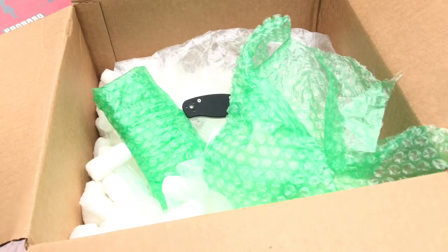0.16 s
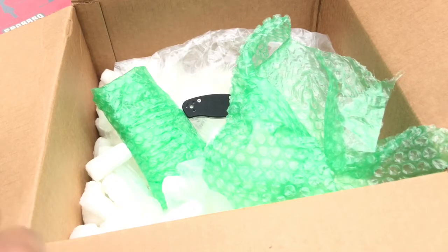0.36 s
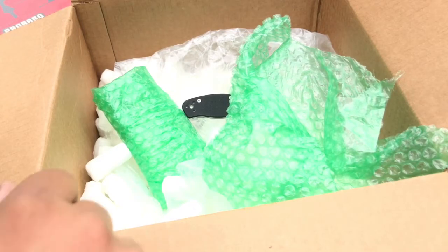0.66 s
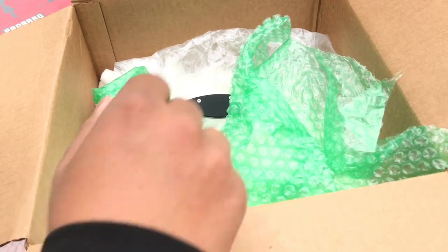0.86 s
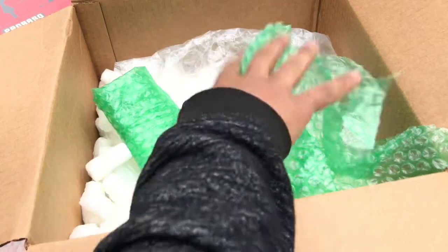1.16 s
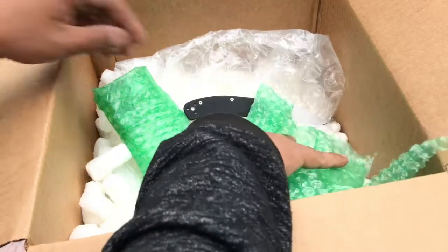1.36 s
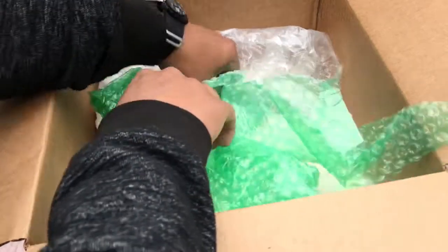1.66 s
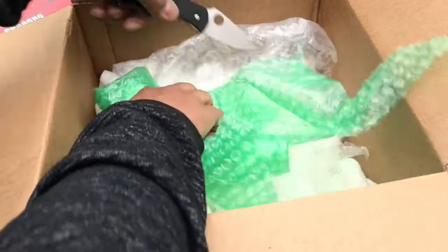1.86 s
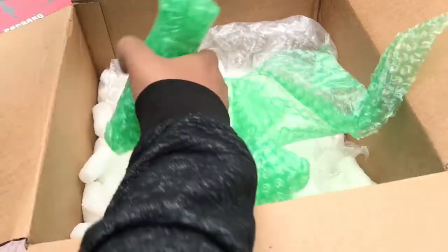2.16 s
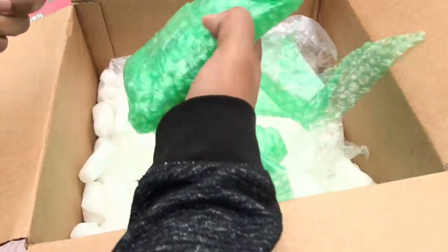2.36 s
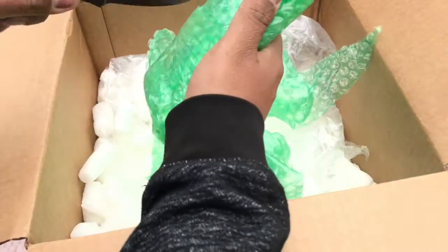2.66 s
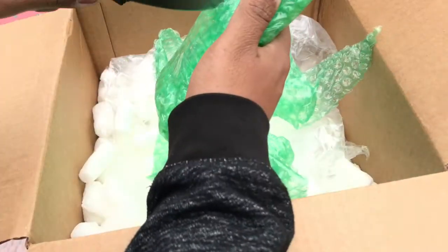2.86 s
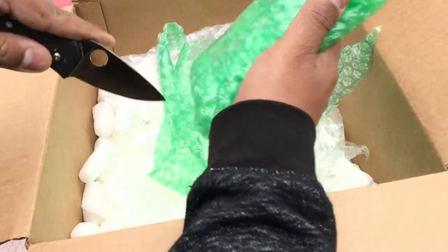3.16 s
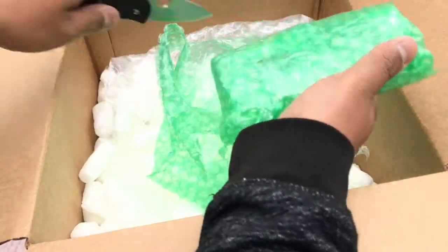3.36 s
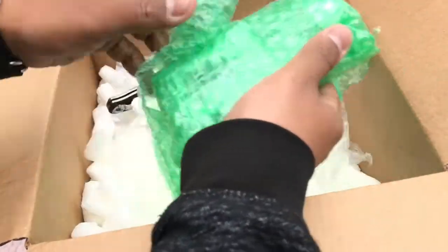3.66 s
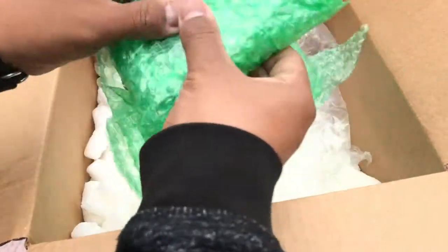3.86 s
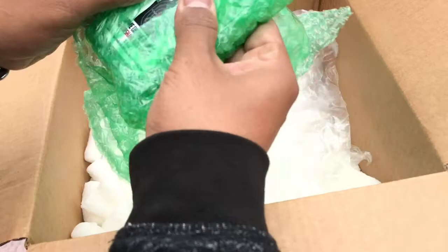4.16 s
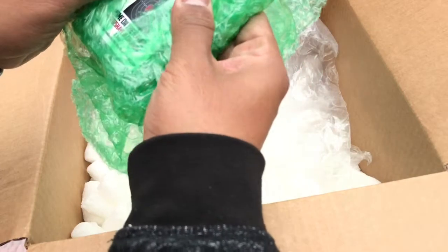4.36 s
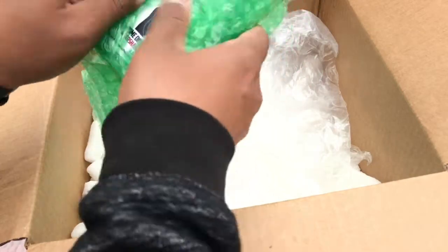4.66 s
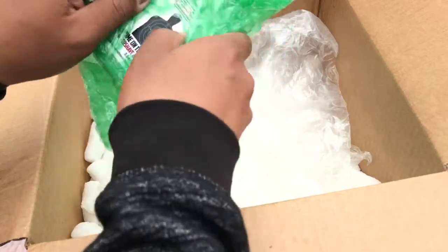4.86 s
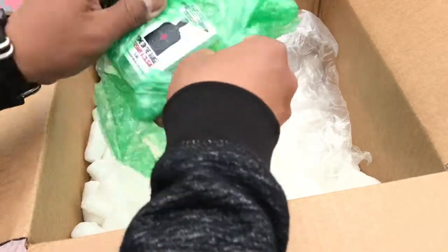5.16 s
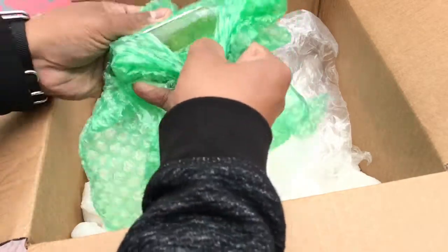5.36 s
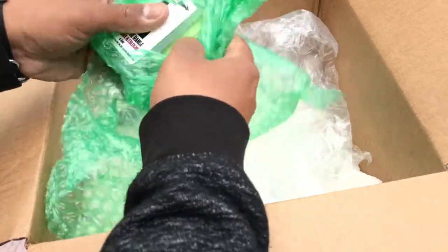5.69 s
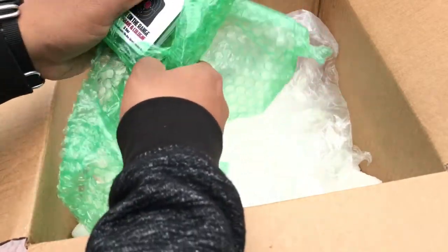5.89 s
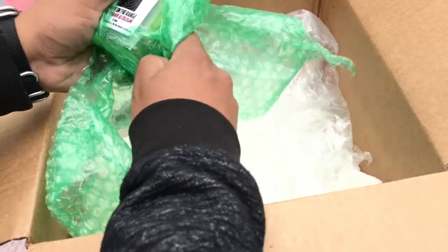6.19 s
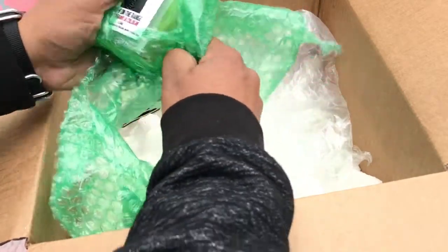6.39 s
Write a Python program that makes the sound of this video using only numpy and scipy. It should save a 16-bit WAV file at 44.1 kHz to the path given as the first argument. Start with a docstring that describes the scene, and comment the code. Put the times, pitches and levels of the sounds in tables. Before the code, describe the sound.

Close indoor unwrapping: an arm bumps the carton, plastic film rustles, a blade cuts it, and dense bright crackling follows with peeling tape.

```python
"""Unwrapping a parcel from bubble wrap

Hands unwrap a small parcel inside a cardboard box in a quiet room: an arm knocks the box, which
rings in damped modes, a sleeve hisses as filtered noise and a knife slits the film. The wrap is
pulled apart: creases snap as short resonances over a rustle of tiny clicks and sliding hiss, tape
lets go tick by tick, and stretched film whistles as gliding sines and squeals in overtones."""
import sys
import numpy as np
from scipy import signal
from scipy.fft import rfft, irfft
from scipy.io import wavfile
from scipy.ndimage import uniform_filter1d, map_coordinates

SR = 44100
rng = np.random.default_rng(int(sys.argv[2]) if len(sys.argv) > 2 else 0)


def unload_wav(signal):
    """Save mono or channel-first audio to the path in sys.argv[1] as 16-bit WAV at rate SR, clipped to [-1, 1]."""
    wavfile.write(
        sys.argv[1],
        SR,
        np.round(np.clip(np.atleast_2d(signal).T, -1, 1) * 32767).astype(np.int16),
    )


N = 287973
TIME = np.arange(N) / SR


def from_db(db):
    """Logarithmic level: decibels to amplitude gain."""
    return 10 ** (np.asarray(db) / 20)


def rms_one(x):
    """Normalisation of effective value: scale to unit rms."""
    return x / np.sqrt(np.mean(x ** 2) + 1e-20)


def in_time(rows):
    """Linear interpolation: each column of a curve at every sample."""
    s, *columns = np.transpose(rows)
    return [np.interp(TIME, s, column) for column in columns]


def during(rows):
    """Gating: true between the first and last row of a curve."""
    return (TIME > rows[0][0]) & (TIME < rows[-1][0])


def butter(x, hz, kind, order=2):
    """Causal filtering with a maximally flat (Butterworth) passband."""
    edges = np.clip(hz, 10, .45 * SR)
    sections = signal.butter(order, edges, kind, fs=SR, output="sos")
    return signal.sosfilt(sections, x + 1e-18)


def drift(per_s):
    """Slow random fluctuation of unit rms: straight lines between random knots."""
    knots = rng.standard_normal(int(N / SR * per_s) + 2)
    return rms_one(np.interp(TIME * per_s, np.arange(len(knots)), knots))


def fade(t60, size):
    """Exponential decay: 60 dB lost in t60 seconds."""
    return from_db(-60 * TIME[:size] / t60)


def ring(x, hz, t60):
    """Damped resonance: a unit click starts a decaying sine whose initial height is about one."""
    radius = from_db(-60 / (t60 * SR))
    angle = 2 * np.pi * min(hz, .45 * SR) / SR
    return signal.lfilter([0, radius * np.sin(angle)],
                          [1, -2 * radius * np.cos(angle), radius * radius], x + 1e-18)


def colour(x, spectrum, size=4096):
    """Minimum-phase filtering: a causal response with the given spectrum, built by its cepstrum."""
    hz, db = np.transpose(spectrum)
    grid = np.maximum(np.arange(size // 2 + 1) * SR / size, 1)
    cepstrum = irfft(np.log(from_db(np.interp(np.log(grid), np.log(hz), db))))
    # fold the cepstrum onto positive time
    cepstrum[1:size // 2] *= 2
    cepstrum[size // 2 + 1:] = 0
    response = irfft(np.exp(rfft(cepstrum)))
    return signal.fftconvolve(x, response)[:len(x)]


def even(x, size=1100):
    """Automatic gain: divide by the smoothed rms, steadying loudness but keeping single grains."""
    power = uniform_filter1d(uniform_filter1d(x * x, size), size)
    return x / np.sqrt(np.abs(power) + 1e-6 * np.mean(x * x))


def add(out, s, sound):
    """Superposition: mix a short sound in, starting at s seconds."""
    i = int(np.clip(round(s * SR), 0, N - 1))
    out[i:i + len(sound)] += sound[:N - i]


# Spectrum of the room noise. Each row: frequency in Hz, relative level in dB.
ROOM_SPECTRUM = [(20, -26), (35, -13), (55, 0), (90, -21), (130, -15.5), (200, -15.5), (600, -22),
                 (1100, -23), (2000, -36), (3800, -28), (7000, -41.5), (16000, -43)]
# Low hum in the room. Each row: time in seconds, mean level in dB.
HUM_LEVELS = [(0, -64), (.2, -59), (.45, -72), (.55, -55.5), (1.2, -53.5), (2.2, -70), (3.2, -57),
              (3.6, -70), (6.53, -83)]
# Low rumble while the arms move. Each row: time in seconds, level in dB.
RUMBLE_LEVELS = [(0, -65), (.7, -60), (1.1, -54), (1.8, -52.5), (2.3, -57), (3.3, -60.5), (3.7, -50),
                 (4.2, -59.5), (4.8, -53.5), (5.8, -56), (6.53, -57.5)]


def background(air_db=-59.5, hum_hz=130, whine_hz=2530, whine_db=-74.5):
    """Broadband and narrowband noise: room air, a faint whine, a wavering hum and a low rumble."""
    air = from_db(air_db) * rms_one(colour(rng.standard_normal(N), ROOM_SPECTRUM))
    whine = from_db(whine_db) * rms_one(ring(rng.standard_normal(N), whine_hz, t60=0.029))
    hum_phase = 2 * np.pi * np.cumsum(hum_hz + 3 * drift(21)) / SR
    hum = from_db(in_time(HUM_LEVELS)[0] + 2 * drift(12)) * rms_one(np.sin(hum_phase))
    low_noise = rms_one(butter(rng.standard_normal(N), [50, 105], "band"))
    rumble = from_db(in_time(RUMBLE_LEVELS)[0]) * low_noise
    return air + whine + hum + rumble


# Soft bumps of hands and parcel.
# Each row: start in seconds, initial level in dB, frequency in Hz, t60 in seconds.
SOFT_BUMPS = [(0.143, -41.5, 365, 0.051), (1.02, -35.5, 302, 0.055), (1.565, -34, 171, 0.029),
              (1.583, -27.5, 388, 0.045), (2.297, -34, 295, 0.024), (3.62, -31, 300, 0.062),
              (3.652, -36, 65, 0.1), (4.095, -40, 170, 0.032), (4.68, -44, 180, 0.055),
              (5.047, -34, 130, 0.045), (5.221, -38, 72.4, 0.12), (5.43, -31, 377, 0.029),
              (5.448, -32.5, 74, 0.3), (5.711, -42, 77, .15), (5.854, -37, 245, .07)]
# Light brushes against the wrap. Each row: start in seconds, initial level in dB, t60 in seconds.
LIGHT_BRUSHES = [(0.0404, -51.5, .008), (0.1413, -45, 0.11), (0.158, -49.5, 0.12), (.5745, -55, 0.0091),
                 (1.1748, -44.5, 0.0078)]


def light_touches(size=12000):
    """Damped resonance and decaying noise: padded bumps ring low, brushes are puffs of hiss."""
    out = np.zeros(N)
    for s, level_db, hz, t60 in SOFT_BUMPS:
        add(out, s, from_db(level_db) * ring(signal.unit_impulse(size), hz, t60))
    for s, level_db, t60 in LIGHT_BRUSHES:
        hiss = rms_one(butter(rng.standard_normal(size), [900, 15000], "band", order=1))
        add(out, s, from_db(level_db) * hiss * fade(t60, size))
    return out


def sleeve(reach_s=0.91, width_s=0.34, level_db=-60):
    """Friction noise: cloth hisses most as the arm, reaching over the box, passes closest."""
    nearness = np.exp(-((TIME - reach_s) / width_s) ** 2)
    hiss = rms_one(butter(rng.standard_normal(N), [720, 3950], "band", order=4))
    return from_db(level_db) * nearness * hiss


# Blows on the box. Each row: start in seconds, relative strength in dB, contact cut-off in Hz.
BOX_BLOWS = [(.8310, -4.5, 6140), (0.8378, -26, 4000), (0.8789, -16, 3480), (0.9895, -23, 1500)]
# Vibration modes of the box. Each row: frequency in Hz, relative level in dB, t60 in seconds.
PANEL_MODES = [(215, -17, 0.18), (368, -10, 0.31), (442, 1, 0.087), (506, -5.5, 0.16), (731, -8, 0.16),
               (870, -8, 0.14), (1000, -3, 0.044), (1060, -11, 0.054), (1310, -17, 0.048), (1463, -4, 0.11),
               (1610, -2, 0.065), (2060, -0.5, 0.031), (2400, 0, 0.036), (2520, -10.5, 0.089),
               (3140, -10, 0.057), (3550, -2.5, 0.052), (4130, -1.5, 0.055)]
# Spectrum of the papery crack. Each row: frequency in Hz, relative level in dB.
CARDBOARD_SPECTRUM = [(47, -61), (80, -14), (219, -12), (325, -8.5), (371, -1.5), (515, -5), (587, -9),
                      (655, -5.5), (2230, -16.5), (4120, -19.5), (15000, -43)]


def knocks(crack_t60=0.1, boom_t60=0.63, boom_top_hz=480, boom_db=-23.5, modes_db=-15.0,
           noise_gain=0.45, level_db=0.03, size=30000):
    """Modal synthesis: panel modes ring under a papery noise crack; a low noise boom hangs on."""
    out = np.zeros(N)
    for s, strength_db, contact_hz in BOX_BLOWS:
        modes = np.zeros(size)
        for hz, db, t60 in PANEL_MODES:
            gain = from_db(db + rng.normal(0, 0.97)) * rng.choice([-1, 1])
            modes += gain * ring(signal.unit_impulse(size), hz, t60)
        crack = rms_one(colour(rng.standard_normal(size), CARDBOARD_SPECTRUM)) * fade(crack_t60, size)
        low_noise = butter(rng.standard_normal(size), [120, boom_top_hz], "band", order=3)
        boom = rms_one(low_noise) * fade(boom_t60, size)
        blow = from_db(modes_db) * modes + noise_gain * (crack + from_db(boom_db) * boom)
        # a softer contact excites less treble
        blow = butter(blow, contact_hz, "low", order=1)
        add(out, s, butter(blow, 73, "high") * from_db(strength_db + level_db))
    return out


# Steady rustle of the held wrap, before the band trims in crinkle().
# Each row: time in seconds, crinkle level in dB, dull rubbing in dB relative to the crinkle,
# fine fizz in dB relative to the crinkle.
GRIP_LEVELS = [(1.23, -53.5, -3, 9), (1.5, -56.5, -0.5, -3), (1.63, -49, -1, -1), (2.1, -52.5, 0.5, -0.5),
               (2.65, -54.5, -11, -3.5), (2.85, -66.5, -4, 2.5), (3.02, -51, -13, 0), (3.23, -59.5, 0, 0),
               (3.42, -54.5, -8, -3.5), (3.54, -56.5, 0.5, -2), (3.68, -43, -0.5, 1.5), (3.9, -41, -16, -1),
               (4.22, -51.5, -16.5, 4), (4.77, -48.5, -13, 5), (4.95, -43.5, -17, 1),
               (5.45, -46.5, -12.5, 7), (6.0, -45, -9.5, 0.5), (6.53, -42, -14, 4.5)]


def grip():
    """Spectral balance of steady friction: rub, crinkle and fizz gains, near zero outside the grip."""
    level_db, rub_db, fizz_db = in_time(GRIP_LEVELS)
    gains = from_db([level_db + rub_db, level_db, level_db + fizz_db])
    return gains * during(GRIP_LEVELS) + 1e-6


# Swells of each brush, squeeze or pull, before the band trims in crinkle().
# Each row: peak time in seconds, rise in seconds, fall in seconds, crinkle level in dB,
# dull rubbing in dB relative to the crinkle, fine fizz in dB relative to the crinkle.
HAND_STROKES = [(1.312, 0.082, 0.077, -39.5, -5.5, 1.5), (1.575, 0.047, 0.037, -40.5, 3, -3),
                (1.69, 0.014, 0.089, -48.5, -1, -1), (1.88, 0.26, .15, -45.5, -7.5, -1.5),
                (2.46, 0.063, .12, -50, -18, 4.5), (2.905, 0.022, .022, -45, -11, -0.5),
                (2.975, .03, 0.052, -42, -15, -2), (3.042, 0.014, 0.043, -36.5, -10, -1),
                (3.105, 0.042, 0.052, -33, -13.5, -12), (3.146, 0.044, 0.053, -33.5, -14.5, -2),
                (3.576, .018, 0.017, -39, -3.5, -5), (3.638, 0.055, 0.036, -36, -2, -2.5),
                (3.8, 0.068, 0.056, -41, -9.5, 2), (3.915, .02, .02, -44, -22, -3),
                (3.978, 0.033, 0.058, -37, -21, 3), (4.095, 0.052, 0.075, -37, -22, 6.5),
                (4.29, 0.089, .14, -45, -17, 3.5), (4.525, 0.042, 0.014, -43, -16, 14),
                (4.583, .012, 0.043, -41.5, -16, 1), (4.648, .02, 0.025, -44, -12, 2),
                (4.696, 0.032, 0.078, -41.5, -8.5, 3.5), (4.805, 0.017, .012, -44, -20, 3),
                (4.86, 0.031, 0.045, -41, -20, 3), (5.02, 0.043, 0.039, -49, -9, 13),
                (5.195, 0.078, 0.086, -37, -25, 7.5), (5.295, 0.08, 0.09, -35.5, -37, 9),
                (5.405, 0.044, 0.026, -38.5, -19, 0), (5.51, 0.036, 0.063, -34.5, -15, 1.5),
                (5.78, 0.19, 0.18, -42, -8, 1), (6.11, 0.055, 0.027, -44, -5, 4.5),
                (6.299, 0.04, 0.043, -39.5, -19, 6), (6.371, 0.022, 0.046, -30.5, -29, 4),
                (6.515, 0.063, 0.046, -43, -12, 6.5)]


def handling(sharpness=0.92):
    """Addition of powers: every stroke is an arch of effort on the grip; gives band levels in dB."""
    power = grip() ** 2
    for peak, rise, fall, level_db, rub_db, fizz_db in HAND_STROKES:
        start, end = peak - rise, peak + fall
        now = (TIME > start) & (TIME < end)
        progress = np.interp(TIME[now], [start, peak, end], [0, .5, 1])
        arch = np.sin(np.pi * progress) ** sharpness  # higher sharpness: more pointed
        gains = from_db([level_db + rub_db, level_db, level_db + fizz_db])
        power[:, now] += np.outer(gains, arch) ** 2
    return 10 * np.log10(power)


def folds(x, mirror=0.56, delay_s=0.000445, wander=0.474, per_s=16):
    """Comb filtering: a reflection from a nearby moving fold keeps shifting the film's colour."""
    lag = delay_s * np.exp(wander * drift(per_s))
    depth = mirror * np.tanh(drift(per_s))
    reflection = map_coordinates(x, [(TIME - lag) * SR], order=3)
    return (x + depth * reflection) / np.sqrt(1 + depth ** 2)


# Manner of touch. Each row: time in seconds, smooth sliding hiss in dB relative to the creases,
# tautness as upper over lower crinkle in dB.
TOUCH_MANNER = [(1.28, 5, 3.5), (1.5, 2.5, 0.5), (2.0, .5, 0), (2.75, -4, 6.5), (3.1, -3.5, 0),
                (3.4, 2.5, 5.5), (3.65, 2, 1.5), (4.05, -3.5, 8), (4.58, -8.5, 2.5), (5.05, -1.5, 2),
                (5.3, 0.5, 7), (5.8, 1, 3.5), (6.2, -3.5, 1), (6.35, 2, 12), (6.5, -7.5, 9)]
# Spectrum of the plastic film. Each row: frequency in Hz, relative level in dB.
FILM_SPECTRUM = [(59, -26), (100, -3), (420, -5.5), (758, -10.5), (1730, -4.5), (2180, -7.5), (4960, -6.5),
                 (5870, 2), (7730, 3), (8580, 7), (10400, 5), (11800, 5.5), (15500, -2)]


def crinkle(creases_per_s=1050, spread_db=5.5, cycles=10.2, rub_db=1.0, crinkle_db=2.0, fizz_db=-1.5,
            rub_hiss_db=3.0, low_edge_hz=1130):
    """Random buckling: countless small creases ring at chance times over hiss of film on film."""
    rub, mid, fizz = handling()
    hiss_db, taut_db = in_time(TOUCH_MANNER)
    # creases come faster with more sliding, and cluster at random
    per_s = creases_per_s * from_db(hiss_db) * from_db(4 * drift(90))
    sizes = from_db(spread_db * np.minimum(rng.exponential(1, N), 2.8)) * rng.choice([-1, 1], N)
    clicks = sizes * (rng.random(N) < per_s / SR)
    # each click is dealt to one facet pitch
    pitches = np.geomspace(1300, 14500, 24)
    dealt = rng.integers(0, len(pitches), N)
    facets = np.zeros(N)
    for k, hz in enumerate(pitches):
        facets += ring(clicks * (dealt == k), hz, cycles / hz) * np.sqrt(hz)  # high ones are stronger
    brightened = np.diff(facets, prepend=0) + .5 * facets
    grains = folds(colour(brightened, FILM_SPECTRUM))
    hiss = folds(colour(rng.standard_normal(N), FILM_SPECTRUM)) * from_db(2.0 * drift(150))

    def band(edges, smooth_db=0):
        """Band-pass mixing: creases and hiss within one range of pitch, at a steady level."""
        creases = even(butter(grains, edges, "band", order=3))
        sliding = rms_one(butter(hiss, edges, "band", order=3))
        return even(creases + from_db(hiss_db + smooth_db) * sliding)

    # taut film crinkles higher than slack film
    body = even(band([low_edge_hz, 2600]) + from_db(taut_db) * band([2600, 4900]))
    rubbing = from_db(rub + rub_db) * band([160, 1000], rub_hiss_db)
    fizzing = from_db(fizz + fizz_db) * band([5200, 18000])
    return rubbing + from_db(mid + crinkle_db) * body + fizzing


def lesser_snaps(per_s=11, pitch_hz=6300, pitch_spread=0.29, over_grip_db=15.5, spread_db=2.5,
                 pop_db=-16, count=300):
    """Random thinning: of many possible creases some give way, as strongly as the grip is firm."""
    s, grip_db = np.transpose(GRIP_LEVELS)[:2]
    when = rng.uniform(s[0], s[-1], count)
    level_db = np.interp(when, s, grip_db) + over_grip_db + rng.normal(0, spread_db, count)
    hz = pitch_hz * np.exp(rng.normal(0, pitch_spread, count))
    gives_way = rng.random(count) < per_s * (s[-1] - s[0]) / count
    return list(np.column_stack([when, level_db, hz, level_db + pop_db])[gives_way])


def snap(hz, level_db, cycles, flutter, flutter_t60, size=300):
    """Snap-through buckling: a facet flips with a sharp step, brief ringing and noisy flutter."""
    push = signal.unit_impulse(size) + flutter * rng.standard_normal(size) * fade(flutter_t60, size)
    wave = ring(push - np.roll(push, 1) * 0.55, hz, cycles / hz)
    # the level is that of the whole energy packed into a millisecond
    return wave * from_db(level_db) / np.sqrt(np.sum(wave ** 2) / (SR / 1000))


# The loudest creases snapping over.
# Each row: start in seconds, crack level over a millisecond in dB before filtering,
# crack pitch in Hz, dull pop of the sheet in dB before its trim and filtering.
LOUD_SNAPS = [(1.39, -27.5, 7240, -61), (1.5818, -26, 3460, -45), (2.2024, -35, 1890, -62),
              (2.3166, -34.5, 5800, -63), (2.4176, -35, 6400, -61), (2.6895, -35.5, 5660, -65),
              (2.7799, -34, 2480, -51), (2.8097, -37.5, 5000, -60), (2.971, -26, 3420, -42),
              (3.0403, -15, 2120, -26.5), (3.0659, -16.5, 2140, -31), (3.084, -24, 2700, -36),
              (3.1092, -12.5, 2350, -35), (3.1271, -13, 2680, -40), (3.1398, -11, 2930, -43),
              (3.1517, -22, 3100, -43), (3.1686, -18, 3200, -44), (3.178, -17.5, 3100, -29.5),
              (3.198, -33.5, 3500, -55), (3.2534, -19.5, 2620, -39), (3.2818, -34, 4200, -60),
              (3.832, -18, 5560, -50), (3.9007, -27, 7900, -49), (4.0036, -20.5, 5500, -65),
              (4.0533, -21, 5370, -64), (4.0962, -14, 6600, -29.5), (4.1246, -23, 8300, -61),
              (4.1375, -19, 6300, -39.5), (4.1487, -15.5, 9800, -59), (4.1702, -18.5, 9900, -62),
              (4.267, -15.5, 7240, -65), (4.3372, -24.5, 2820, -56), (4.4685, -21.5, 9100, -63),
              (4.4784, -24, 6250, -43), (4.5113, -27, 7240, -63), (4.5323, -24, 6550, -37),
              (4.5905, -24, 5300, -48), (4.6718, -27, 6800, -48), (4.6903, -19.5, 8900, -47),
              (4.7032, -20.5, 3500, -40), (4.8097, -24.5, 6240, -57), (4.875, -21.5, 7600, -44),
              (4.9565, -27, 7500, -60), (5.0066, -27, 8300, -56), (5.075, -23, 8050, -54),
              (5.0893, -20, 3400, -53), (5.1341, -23, 6500, -55), (5.1824, -16.5, 3240, -62),
              (5.2202, -21, 5700, -29.5), (5.2277, -12, 2920, -47), (5.2445, -14, 5960, -53),
              (5.4724, -21, 7140, -55), (5.5338, -23, 4570, -37), (5.7746, -17.5, 5040, -44),
              (5.8976, -25, 6800, -39), (5.9833, -22.5, 6520, -58), (6.0339, -16.5, 5330, -53),
              (6.1141, -26, 8050, -35), (6.1423, -23, 9700, -60), (6.166, -15.5, 4500, -29),
              (6.302, -12.5, 4130, -39), (6.3335, -20, 7200, -50), (6.3553, -18, 8140, -51),
              (6.4036, -19.5, 4900, -54), (6.455, -26, 7400, -54), (6.526, -23.5, 3970, -41)]


def snaps(pop_db=0.5, pop_hz=640, facet_db=-9.0, lowest_hz=1150):
    """Coupled resonators: each snapping crease shakes a larger facet and dully pushes the sheet."""
    out = np.zeros(N)
    for s, level_db, hz, sheet_db in LOUD_SNAPS + lesser_snaps():
        crack = snap(hz, level_db, cycles=3.0, flutter=0.051, flutter_t60=0.01)
        facet_hz = hz * rng.uniform(0.298, 0.79)
        facet = snap(facet_hz, level_db + facet_db, cycles=13.0, flutter=0.95, flutter_t60=0.015)
        add(out, s, butter(crack + facet, lowest_hz, "high", order=3))
        pop = snap(pop_hz, sheet_db + pop_db, cycles=3.7, flutter=0.045, flutter_t60=0.011)
        add(out, s, butter(pop, 1250, "low"))
    return out


# Thin gliding whistles during the cut. Each row: peak time in seconds, frequency at the peak in Hz,
# glide in Hz per second, peak rms level in dB, t60 in seconds.
CUT_WHISTLES = [(2.968, 905, -500, -44.5, 0.15), (3.048, 976, 700, -33.5, 0.054),
                (3.184, 838, 1902, -37.5, 0.29)]


def whistle(waver=0.004, rise_db_per_s=1001):
    """Frequency modulation: nearly pure tones swell quickly, glide and die away."""
    out, unsteady = np.zeros(N), 1 + waver * drift(150)
    for peak, hz, glide, level_db, t60 in CUT_WHISTLES:
        now = (TIME > peak - 60 / rise_db_per_s) & (TIME < peak + t60)
        t = TIME[now] - peak
        swell_db = np.minimum(rise_db_per_s * t, -60 * t / t60)
        phase = 2 * np.pi * np.cumsum((hz + glide * t) * unsteady[now]) / SR
        out[now] += np.sqrt(2) * np.sin(phase) * from_db(level_db + swell_db)
    return out


# Tape peeling in regular jerks. Each row: first tick in seconds, last tick in seconds,
# ticks per second, first level in dB, last level in dB, mean pitch in Hz.
TAPE_PEELS = [(4.1785, 4.214, 280, -23.5, -23, 10500), (4.23, 4.2607, 100, -18.5, -23, 8600),
              (4.2778, 4.33, 95, -23, -19.5, 10900), (4.3434, 4.388, 132, -22, -31.5, 9500),
              (4.398, 4.461, 135, -34, -37, 8000), (4.5272, 4.5433, 205, -15, -19.5, 7150),
              (5.036, 5.0508, 160, -23, -23, 8100), (6.2670, 6.297, 500, -36, -37, 9500),
              (6.37, 6.383, 430, -31, -33, 9500)]


def peels(jitter_s=0.00033, cycles=3.4, flutter=0.46, flutter_t60=0.0028, low_edge_hz=1300):
    """Stick-slip peeling: tape holds, stretches and lets go in nearly even jerks."""
    out = np.zeros(N)
    for first, last, per_s, first_db, last_db, pitch_hz in TAPE_PEELS:
        count = round((last - first) * per_s) + 1
        times = np.linspace(first, last, count)
        levels_db = np.linspace(first_db, last_db, count)
        for s, level_db in zip(times, levels_db):
            tick_hz = pitch_hz * np.exp(rng.normal(0, .048))
            tick = snap(tick_hz, level_db + rng.normal(0, 1), cycles, flutter, flutter_t60)
            add(out, s + rng.normal(0, jitter_s), tick)
    return butter(out, low_edge_hz, "high")


def stick_slip(rows, waver, count):
    """Harmonic series of stick-slip: an uneven slip rate carries overtones of wandering level."""
    hz, db = in_time(rows)
    phase = 2 * np.pi * np.cumsum(hz * (1 + waver * drift(500))) / SR
    slips = sum(np.sin(k * phase) * from_db(3 * drift(120)) for k in np.arange(1, count + 1))
    return rms_one(slips) * from_db(db) * during(rows)


# Stretched film sticking and slipping. Each row: start of the hold in seconds, hold in seconds,
# first slips per second, last slips per second, level in dB.
FILM_SQUEALS = [(5.179, 0.0065, 5700, 6700, -26.5), (5.19, 0.0065, 2000, 2000, -33),
                (5.195, 0.024, 7500, 6400, -37), (5.257, 0.042, 1660, 1880, -27),
                (5.287, 0.017, 8600, 8600, -29), (5.308, .012, 8950, 8100, -32),
                (5.337, .008, 1550, 1800, -34)]


def squeal(waver=.04, attack_s=0.025, release_s=0.033, edge_below_hold_db=-26.0, top_hz=13000):
    """Stick-slip friction: stretched folds drag over the parcel, catch, glide in pitch and let go."""
    out = np.zeros(N)
    for start, hold, first_hz, last_hz, level_db in FILM_SQUEALS:
        edge_db = level_db + edge_below_hold_db
        end = start + hold
        shape = [(start - attack_s, first_hz, edge_db), (start, first_hz, level_db),
                 (end, last_hz, level_db), (end + release_s, last_hz, edge_db)]
        out += stick_slip(shape, waver, count=max(1, int(top_hz / first_hz)))
    return out


def box_echo(x, walls_db=-15.0, walls_t60=0.045, room_db=-30.0, room_t60=0.13, dull_hz=6000, size=14000):
    """Reverberation by convolution: quick cardboard reflections and a faint room tail."""
    def tail(t60):
        """Diffuse reflection: decaying noise of unit energy after a millisecond of silence."""
        noise = rng.standard_normal(size) * fade(t60, size) * (TIME[:size] > .001)
        return noise / np.linalg.norm(noise)

    echo = from_db(walls_db) * tail(walls_t60) + from_db(room_db) * tail(room_t60)
    return x + signal.fftconvolve(x, butter(echo, dull_hz, "low", order=1))[:N]


def scene():
    """Superposition: the wrap echoes in the box, and all other sounds are added dry."""
    rest = background() + light_touches() + sleeve() + knocks() + whistle()
    wrap = crinkle() + snaps() + peels() + squeal()
    return (box_echo(wrap) + rest)[None]


def record(dry, notch_hz=10400, notch_q=18.0, notch_depth=0.55, cutoff_hz=16300):
    """Linear filtering: the microphone port dips the treble; deepest bass and top are cut."""
    b, a = signal.iirpeak(notch_hz, notch_q, fs=SR)
    dipped = dry - notch_depth * signal.lfilter(b, a, dry)
    heard = butter(dipped, 26, "high", order=3)
    low_pass = signal.firwin(151, cutoff_hz, window=("kaiser", 8), fs=SR)
    return signal.fftconvolve(heard, low_pass[None], "same")


dry = scene()
out = record(dry)
unload_wav(out)
```